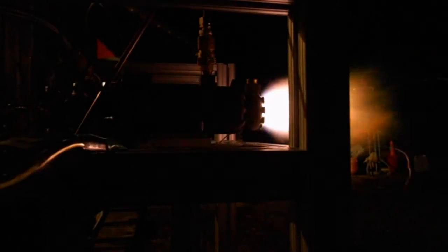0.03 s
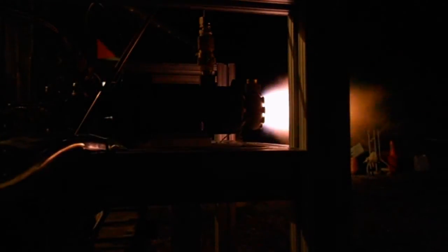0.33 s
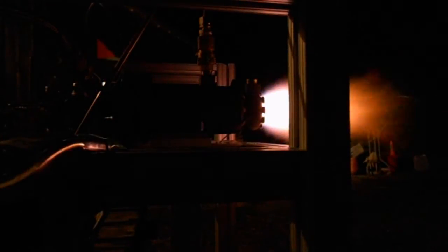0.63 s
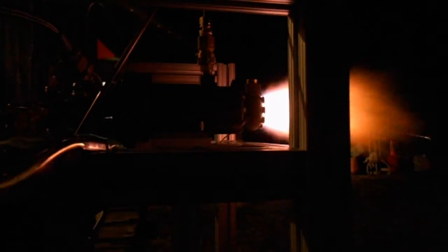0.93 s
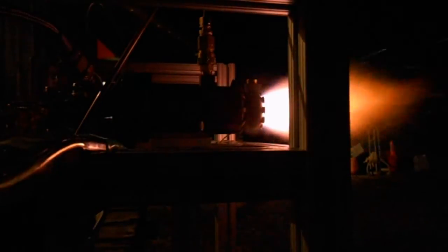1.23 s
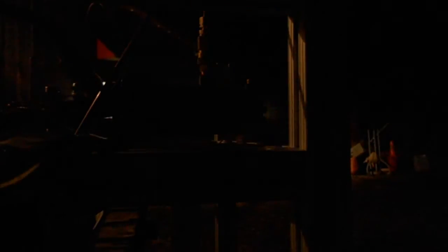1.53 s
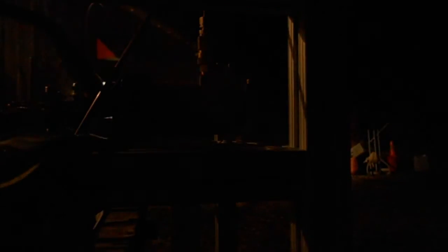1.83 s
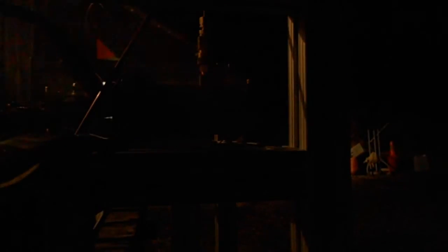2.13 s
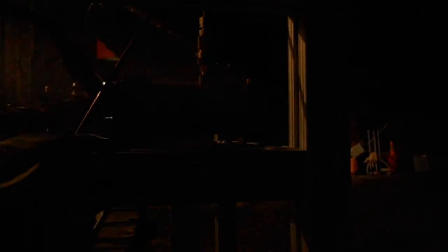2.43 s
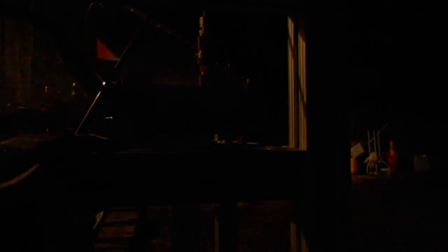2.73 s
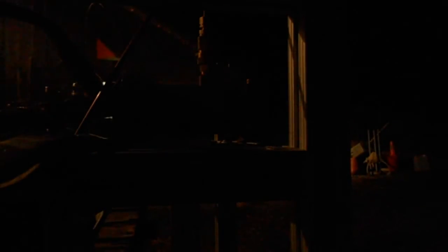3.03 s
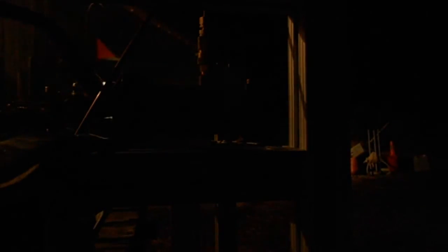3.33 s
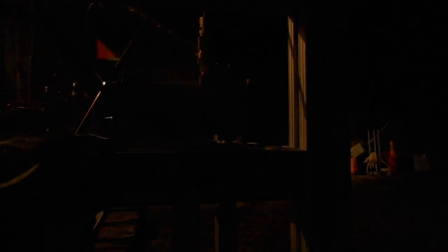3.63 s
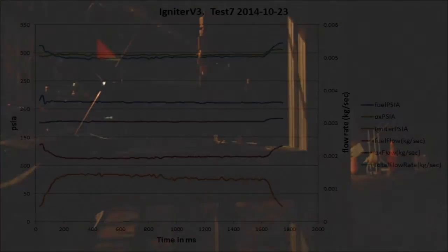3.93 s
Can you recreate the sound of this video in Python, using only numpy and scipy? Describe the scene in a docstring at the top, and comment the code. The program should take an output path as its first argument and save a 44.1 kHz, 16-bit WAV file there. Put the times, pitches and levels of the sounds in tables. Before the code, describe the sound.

A small rocket igniter roars steadily with a hollow note, then stops abruptly in a short, falling rush of gas. A faint hiss and light ticks come from the test bench while wind rumbles on the microphone.

```python
"""On a test bench, a small rocket igniter roars: a turbulent jet crackles with shocks, and a chamber
resonance adds a hollow note early in the burn. At cut-off the remaining gas blows through the chamber's
resonances, which sink as the pressure drains. A weak hiss then swells with a few sharp ticks,
while moving air buffets the microphone."""
import sys
import numpy as np
from scipy import signal
from scipy.fft import rfft, irfft
from scipy.io import wavfile

SR = 44100
rng = np.random.default_rng(int(sys.argv[2]) if len(sys.argv) > 2 else 0)


def wav_out(sig):
    """Save sig, one row per channel (or a flat mono array), as 16-bit PCM at SR to the path in sys.argv[1]."""
    wavfile.write(sys.argv[1], SR, np.round(np.clip(np.atleast_2d(sig).T, -1, 1) * 32767).astype(np.int16))


N = 176400
T, HZ = np.arange(N) / SR, np.fft.rfftfreq(N, 1 / SR)


def amp(db):
    """Decibels to amplitude ratio."""
    return 10 ** (np.asarray(db) / 20)

def unit(x):
    """Normalisation to rms 1."""
    return x / np.sqrt(np.mean(x ** 2) + 1e-20)

def curve(rows, column=1):
    """Linear interpolation of one column in time."""
    rows = np.array(rows)
    return np.interp(T, rows[:, 0], rows[:, column])

def spectrum(points):
    """Interpolation of levels in dB on a log-frequency axis."""
    hz, db = np.transpose(points)
    return np.interp(np.log(HZ + 1), np.log(hz), db)

def colour(x, db):
    """Minimum-phase filtering: the phase follows from the log gain by the Hilbert transform."""
    log_gain = np.log(amp(np.r_[db, db[-2:0:-1]]))
    response = np.exp(np.conj(signal.hilbert(log_gain)))[:len(db)]
    return irfft(rfft(x) * response, len(x))

def noise(points):
    """White noise filtered to a given spectral shape."""
    return unit(colour(rng.standard_normal(N), spectrum(points)))

def drift(hz):
    """Random modulation: noise low-passed at hz."""
    return unit(irfft(rfft(rng.standard_normal(N)) / (1 + (HZ / hz) ** 4), N))

def impulses(per_s, spread_db, cap):
    """A Poisson train of impulses, with exponentially distributed levels up to cap times the spread."""
    heights = amp(spread_db * np.minimum(rng.exponential(1, N), cap))
    return heights * (rng.random(N) < per_s / SR)

def resonance(hz, width_hz, steady=0):
    """A mode driven by turbulence is a carrier with a random envelope; steady=1 evens out its swells."""
    clock = np.cumsum(np.clip(width_hz, 10, 2000) * np.ones(N)) / SR
    steps = 64  # envelope samples per unit of the clock
    pole = np.exp(-np.pi / steps)
    forcing = rng.standard_normal(3 * N) + 1j * rng.standard_normal(3 * N)
    envelope = signal.lfilter([1], np.poly([pole, pole]), forcing)
    envelope = np.interp((clock + 2) * steps, np.arange(len(envelope)), envelope)
    envelope /= (abs(envelope) + 1e-9) ** steady
    carrier = np.exp(2j * np.pi * np.cumsum(hz * np.ones(N)) / SR)
    return unit((envelope * carrier).real)


# air flow over the microphone: time_s, level_db
WIND_LEVEL = [(1.35, -60), (1.5, -38), (1.63, -55), (1.96, -41), (2.03, -31.5), (2.1, -27), (2.62, -28),
              (2.8, -23.5), (3.2, -20.5), (3.8, -16), (4, -22)]
# coarse turbulence: frequency_hz, level_db
WIND_SPECTRUM = [(5, -6), (20, 5), (35, -0.5), (70, -11), (140, -33.5), (400, -65), (3000, -83.5)]
# fine turbulence: frequency_hz, level_db
CHURN_SPECTRUM = [(20, -14), (60, 2), (110, -1), (200, -10.5), (350, -22), (700, -41), (3000, -75)]

def wind():
    """Turbulent pressure on the microphone; the fine scales grow faster with the flow than the coarse."""
    wind_db = curve(WIND_LEVEL)
    churn_db = -27 + 1.65 * (wind_db + 20.5)
    coarse = unit(noise(WIND_SPECTRUM) * amp(3.35 * drift(hz=22)))
    fine = unit(noise(CHURN_SPECTRUM) * amp(4.5 * drift(hz=35.2)))
    return amp(wind_db) * coarse + amp(churn_db) * fine


# eddies striking the microphone: centre_s, length_s, level_db, upper_edge_hz
EDDIES = [(.85, 0.0069, -26, 260), (2.102, 0.0053, -27, 460), (2.115, 0.008, -23.5, 405),
          (2.193, 0.016, -32.5, 360), (2.268, 0.0075, -20, 214.5), (2.294, 0.0046, -22, 417),
          (2.442, 0.034, -26, 90), (2.736, 0.019, -21.5, 111), (2.851, 0.029, -19.5, 204),
          (3.024, 0.013, -14, 194), (3.107, 0.01, -11, 330), (3.186, 0.007, -10, 403),
          (3.27, 0.01, -11, 79), (3.42, 0.023, -12.5, 456), (3.488, 0.0042, -19.5, 450),
          (3.525, 0.03, -16, 290), (3.556, 0.0024, -15.5, 710), (3.582, 0.005, -19.5, 210),
          (3.721, 0.0066, -13, 610), (3.737, 0.014, -17, 400), (3.753, 0.0036, -12, 540),
          (3.872, .012, -19.5, 235), (3.782, 0.0025, -4.5, 640), (3.794, 0.018, -14.5, 445),
          (3.941, 0.01, -18.5, 410), (3.974, 0.017, -19, 327)]

def buffets(low_hz=55.6, spread_db=8.5):
    """Each passing eddy exerts a cluster of uneven pressure pulses, confined to low frequencies."""
    out, size = np.zeros(N), 8192
    t, hz = (np.arange(size) - size // 2) / SR, np.fft.rfftfreq(size, 1 / SR)
    for centre_s, length_s, db, edge_hz in EDDIES:
        window = np.exp(-2 * (t / length_s) ** 2)
        band = (hz + 1) / (hz + low_hz) / np.sqrt(1 + hz / low_hz)
        band /= 1 + (hz / edge_hz) ** 3.52
        pulses = rng.standard_normal(size) * amp(spread_db * rng.standard_normal(size))
        eddy = unit(colour(window * pulses, 20 * np.log10(band))) * np.sqrt(np.mean(window ** 2))
        span = out[round(centre_s * SR) - size // 2:][:size]
        span += amp(db) * eddy[:len(span)]
    return out


# ringing ticks: peak_s, pitch_hz, level_db
RINGING_TICKS = [(2.7728, 4550, -35.5), (2.837, 5100, -45), (2.971, 4000, -34), (2.985, 4400, -36)]

def pings(decay_s=.002):
    """Damped free vibration: each small tick rings at one pitch and decays exponentially."""
    out = np.zeros(N)
    for peak_s, hz, db in RINGING_TICKS:
        age = np.maximum(T - peak_s, 0)
        out += amp(db) * np.exp(-age / decay_s) * np.sin(2 * np.pi * hz * age)
    return out


# sharp ticks: start_s, level_db, tilt_db_per_octave
SHARP_TICKS = [(2.3625, -41.5, -1), (2.4782, -33, -8), (2.5146, -34, -3.5), (2.5353, -44, -2),
               (2.5477, -30.5, -2), (2.564, -43, -3), (2.579, -31, 2), (2.8888, -30.5, -8),
               (2.915, -29, -4.5), (3.0006, -26, -1), (3.098, -25.5, -1), (3.1695, -27, 10),
               (3.4135, -36, -5), (3.488, -42, 4), (3.75, -41, -5), (3.782, -43, -13)]
# colour of a tick: frequency_hz, gain_db
TICK_SPECTRUM = [(500, -27), (2500, -15.5), (4500, -4.5), (7000, -11.5), (10000, -3.5), (13000, -10.5),
                 (16000, -23.5)]

def ticks(hold_s=.00096, decay_s=.00066, tail_s=.0046):
    """Broadband transients, bright or dull, with an exponential tail from the bench."""
    out, size = np.zeros(N), 2048
    t, hz = np.arange(size) / SR, np.fft.rfftfreq(size, 1 / SR)
    octaves = np.log2(np.maximum(hz, 2000) / 8000)
    envelope = np.exp(-np.maximum(t - hold_s, 0) / decay_s) + amp(-4) * np.exp(-t / tail_s)
    for start_s, db, tilt in SHARP_TICKS:
        burst = irfft(rfft(rng.standard_normal(size)) * amp(db + tilt * octaves))
        out[round(start_s * SR):][:size] += envelope * burst
    return colour(out, spectrum(TICK_SPECTRUM))


# swell of the late hiss: time_s, body_db, treble_db
HISS_LEVELS = [(0, -90, -88), (1.9, -80, -92.5), (2.1, -66, -82), (2.4, -58, -71), (2.6, -49.5, -62),
               (2.78, -39, -52.5), (3, -38, -51), (3.17, -39, -51.5), (3.35, -43, -57.5), (3.7, -45.5, -61),
               (4, -51.5, -64)]
# its low band: frequency_hz, level_db
BODY_SPECTRUM = [(60, -10.5), (700, 1.5), (1100, -5), (1600, -11), (2600, -19.5), (4000, -21), (8000, -42)]
# its high band: frequency_hz, level_db
TREBLE_SPECTRUM = [(1000, -9), (3000, 7.5), (4400, 3.5), (6600, -0.5), (9000, 1), (10200, 1.5),
                   (10600, -13), (12000, -1.5), (13300, -9), (16000, -13)]
# its upper resonance: time_s, pitch_hz
HISS_PITCH = [(2.3, 3410), (2.65, 3460), (2.95, 3246), (3.2, 3240), (3.55, 3390), (4, 3420)]

def hiss():
    """Flow noise: a weak stream of gas excites two resonances and crackles faintly."""
    body = unit(noise(BODY_SPECTRUM) + amp(-4) * resonance(hz=1992, width_hz=390))
    crackle = unit(colour(impulses(per_s=130, spread_db=2, cap=4), spectrum(TICK_SPECTRUM)))
    treble = noise(TREBLE_SPECTRUM) + amp(-10.5) * crackle
    treble += amp(2.5) * resonance(curve(HISS_PITCH), width_hz=270)
    body_db = curve(HISS_LEVELS) + 1.6 * drift(hz=30)
    return amp(body_db) * body + amp(curve(HISS_LEVELS, column=2)) * treble


# gas draining after cut-off: time_s, lowest_mode_hz, second_mode_hz, level_db
BLOWDOWN = [(1.44, 1070, 4400, -71), (1.5, 1041, 4320, -30), (1.6, 929, 4160, -36.5),
            (1.73, 930, 4330, -36), (1.81, 883, 4140, -33.5), (1.89, 816, 3920, -34),
            (1.98, 719, 3760, -41.5), (2.04, 644, 3680, -58), (2.09, 600, 3630, -91)]
# upper chamber modes: pitch_hz, width_hz, level_db, share_of_second_mode_glide
UPPER_MODES = [(4250, 480, -2, 1), (8040, 560, -7, .55), (14050, 680, -15.5, -.35)]
# hiss of the draining gas: frequency_hz, level_db
DRAIN_SPECTRUM = [(60, -4.5), (300, 8.5), (1300, 7), (2000, 1.5), (2600, 3.5), (3700, -1.5), (5500, -13),
                  (6800, -5), (8800, -12.5), (10000, 0), (12100, -6), (13000, -13), (16000, -21)]

def drain(full_flow_hz=931):
    """Cavity resonance: as the flow falls, the modes sink and narrow, and the upper ones die first."""
    lowest_hz, second_hz = curve(BLOWDOWN), curve(BLOWDOWN, column=2)
    flow = np.minimum(lowest_hz / full_flow_hz, 1)
    dulling_db, narrowing = 80 * np.log2(flow), flow ** 1.3
    gas = amp(-6 + .32 * dulling_db + 2.9 * drift(hz=120)) * noise(DRAIN_SPECTRUM)
    gas += resonance(lowest_hz, width_hz=270 * narrowing)
    glide = second_hz / UPPER_MODES[0][0]
    for hz, width_hz, db, share in UPPER_MODES:  # the top mode, with a negative share, rises instead
        mode_db = db + dulling_db * min(hz / 7000, 1) + 2 * drift(hz=45)
        gas += amp(mode_db) * resonance(hz * glide ** share, width_hz * narrowing)
    return amp(curve(BLOWDOWN, column=3)) * gas


# chamber note during the burn: time_s, pitch_hz, level_db
BURN_NOTE = [(0, 873.5, -11.5), (.09, 878, -18), (.12, 880, -25), (.56, 885.6, -25.5), (.72, 896, -32),
             (.87, 900, -38), (1.45, 913, -43), (1.52, 950, -84)]

def chamber_note():
    """A cavity mode, partly noise-driven and partly self-sustained, gives a hollow note."""
    pitch_hz = curve(BURN_NOTE) + 8 * drift(hz=15)
    return amp(curve(BURN_NOTE, column=2)) * resonance(pitch_hz, width_hz=81, steady=.29)


# strength of the exhaust jet: time_s, level_db
JET_LEVEL = [(0, -7), (.08, -11), (.11, -16), (.5, -17), (.75, -17), (1, -18.5), (1.2, -17), (1.465, -18.5),
             (1.485, -23), (1.55, -44.5), (1.65, -71)]
# colour of the jet: frequency_hz, level_db
JET_SPECTRUM = [(100, -7), (350, -1.5), (1000, 0.5), (2600, -0.5), (4800, -1), (6500, -5), (8500, -7.5),
                (9300, -7), (10400, -6.5), (12600, -10.5), (13500, -13), (16000, -23)]
# peaks and dips that the bench gives the jet: centre_hz, width_hz, gain_db
BENCH_RESPONSE = [(1394, 90, -3), (2448, 48, 4.5), (2837, 76, 3), (3218, 63, -7), (3337, 57, 3),
                  (3640, 140, -3.5), (5030, 96, -5), (5690, 93, -15), (7350, 160, -7), (14400, 220, -6.5)]
# bright resonances that flare in bursts: pitch_hz, width_hz, level_db
SIZZLE_MODES = [(9480, 930, -14), (12350, 550, -18.5)]
# rumble of the jet: frequency_hz, level_db
RUMBLE_SPECTRUM = [(10, -6.5), (25, 1.5), (60, -6), (120, -10), (250, -19), (600, -39)]

def roar(flutter_db=1.43, rumble_ceiling_db=-6.5):
    """Turbulent jet noise with one-sided shocks, filtered by the bench, plus sizzle and rumble."""
    shocks = -impulses(per_s=6000, spread_db=2.5, cap=4.3)
    jet = rng.standard_normal(N) + amp(-5.5) * unit(shocks - shocks.mean())
    jet *= amp(flutter_db * drift(hz=249))
    bench_db = sum(db * np.exp(-((HZ - hz) / width_hz) ** 2) for hz, width_hz, db in BENCH_RESPONSE)
    jet = unit(colour(jet, spectrum(JET_SPECTRUM) + bench_db))
    jet = unit(jet - .05 * (jet ** 2 - 1))  # loud jet noise peaks harder on one side
    flare = unit(amp(7.5 * np.minimum(drift(hz=130), 2.5)))
    sizzle = flare * sum(amp(db) * resonance(hz, width_hz) for hz, width_hz, db in SIZZLE_MODES)
    rumble = amp(-7) * unit(noise(RUMBLE_SPECTRUM) * amp(6.3 * np.minimum(drift(hz=24), 1.5)))
    jet_db = curve(JET_LEVEL)
    return amp(jet_db) * (jet + sizzle) + amp(np.minimum(jet_db, rumble_ceiling_db)) * rumble


def scene():
    """Superposition of the burn, the draining gas, the late hiss and ticks, and the wind."""
    return (roar() + chamber_note() + drain() + hiss() + ticks() + pings() + wind() + buffets())[None]

def record(dry):
    """Microphone response: a notch from its port, soft saturation and a band limit."""
    port_hz, port_width_hz, port_db = 10980, 450, -11.5
    headroom, edge_hz = .72, 15780
    x = colour(dry[0], port_db / (1 + ((HZ - port_hz) / port_width_hz) ** 4))
    x = x / (1 + (x / headroom) ** 8) ** (1 / 8)
    low_pass = signal.firwin(511, edge_hz, window=("kaiser", 9), fs=SR)
    return signal.oaconvolve(x, low_pass, "same")[None]


dry = scene()
out = record(dry)
wav_out(out)
```